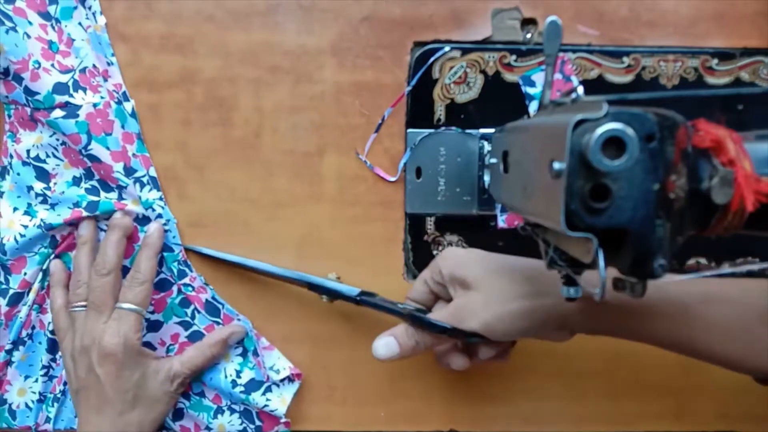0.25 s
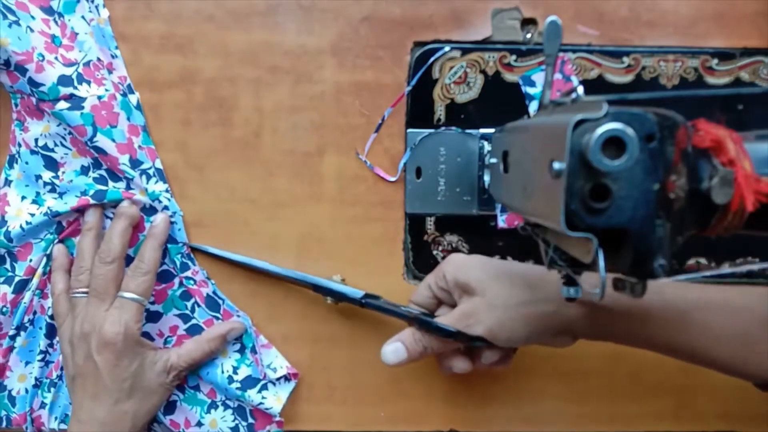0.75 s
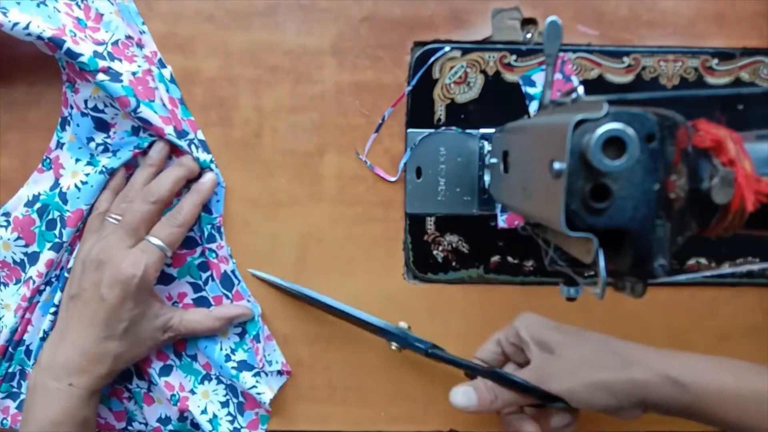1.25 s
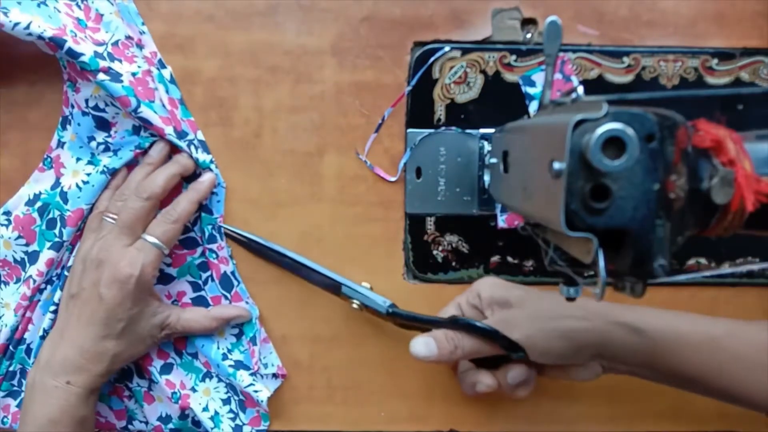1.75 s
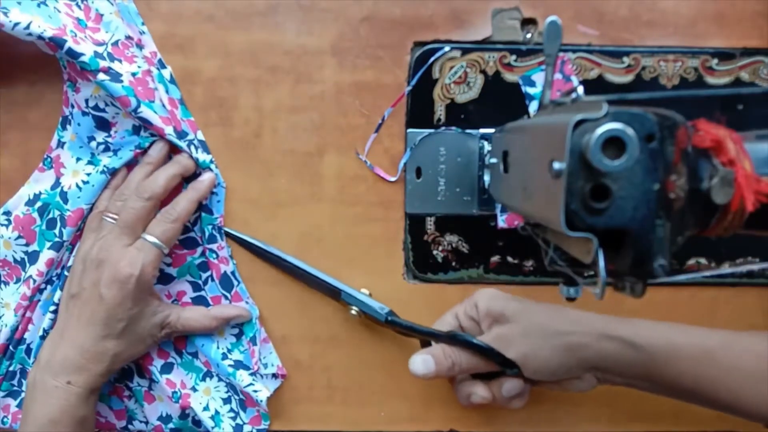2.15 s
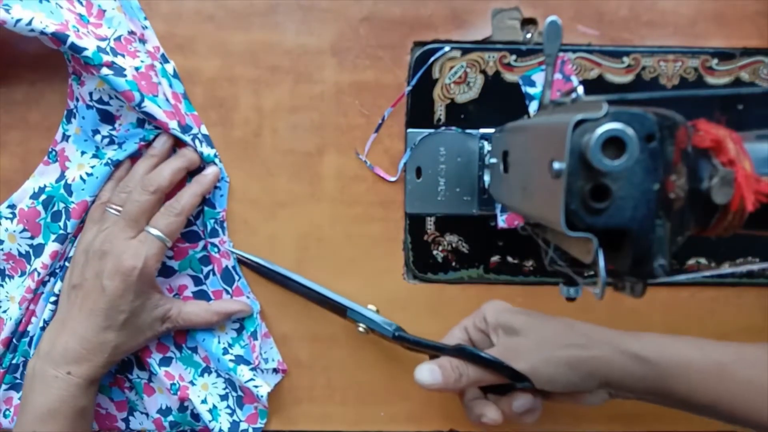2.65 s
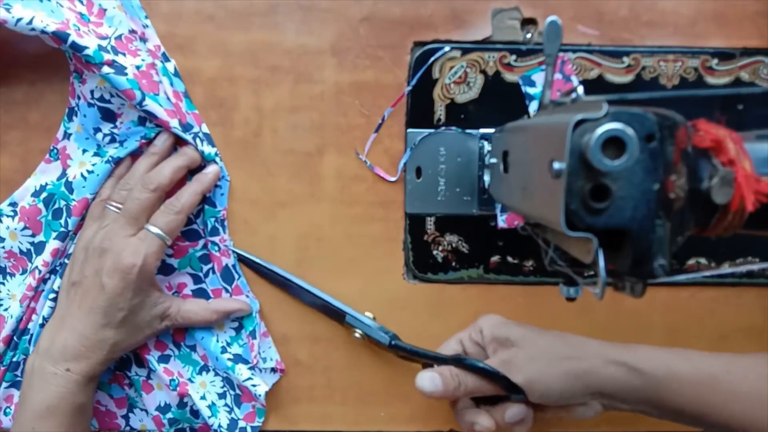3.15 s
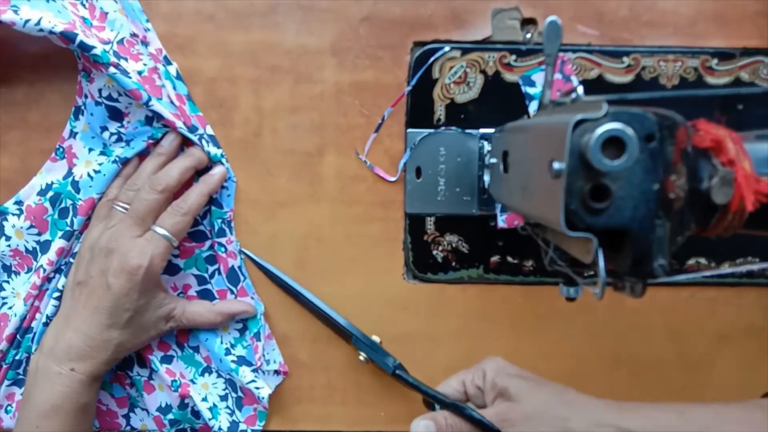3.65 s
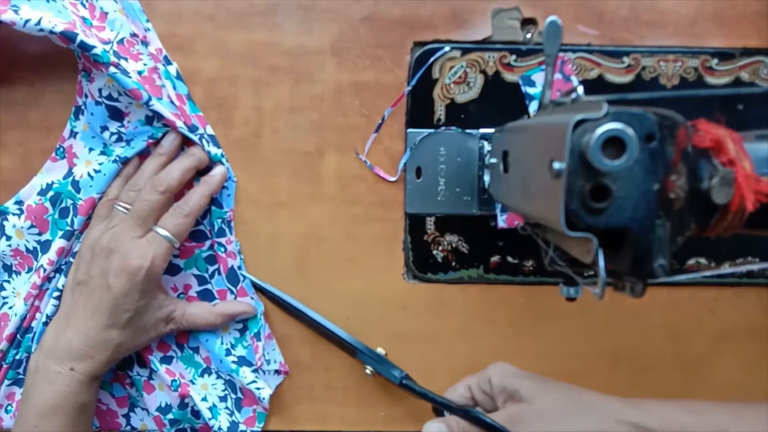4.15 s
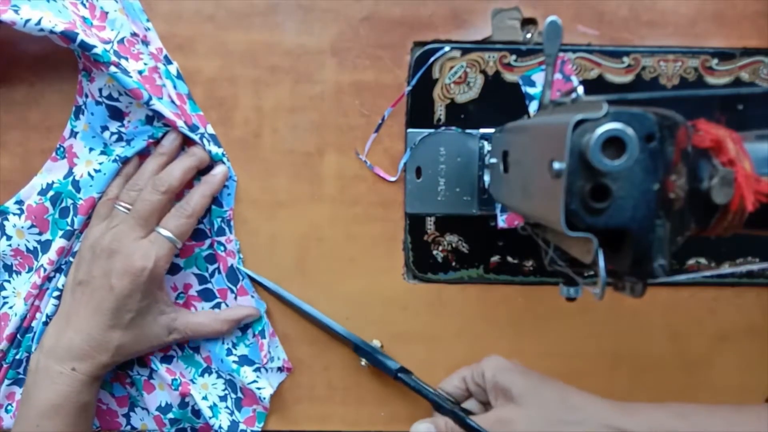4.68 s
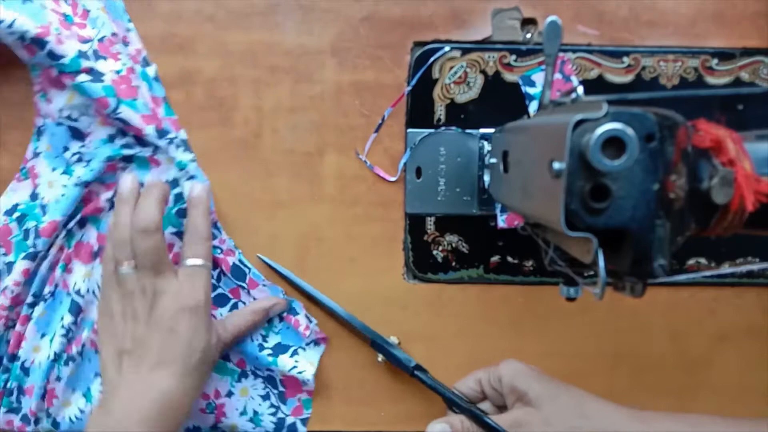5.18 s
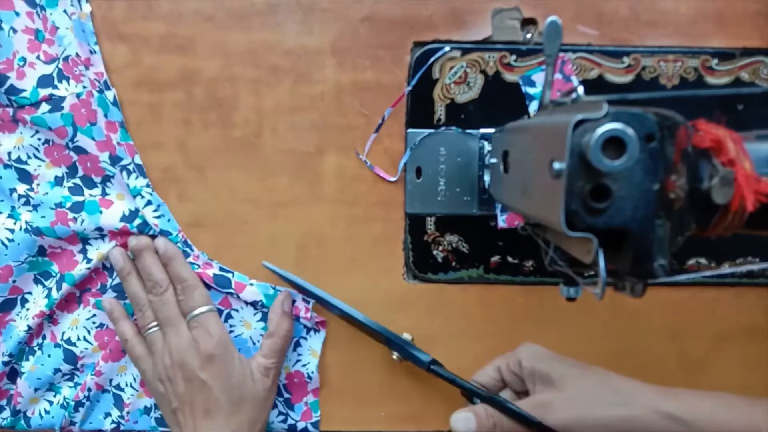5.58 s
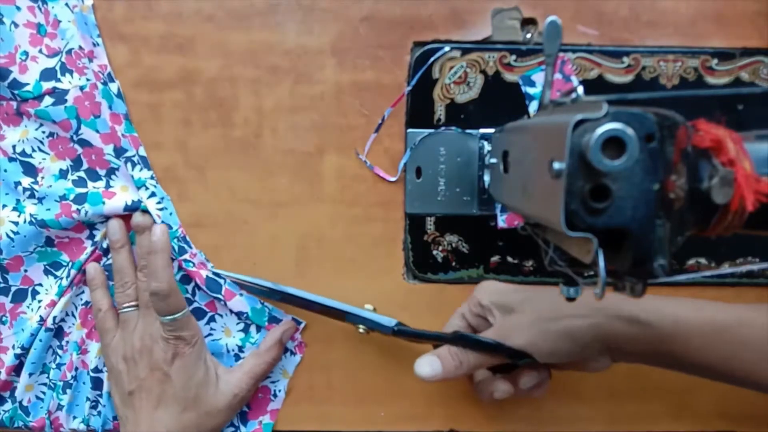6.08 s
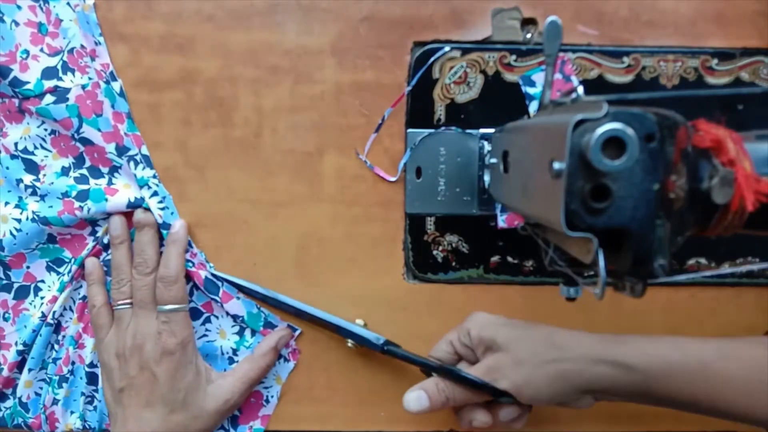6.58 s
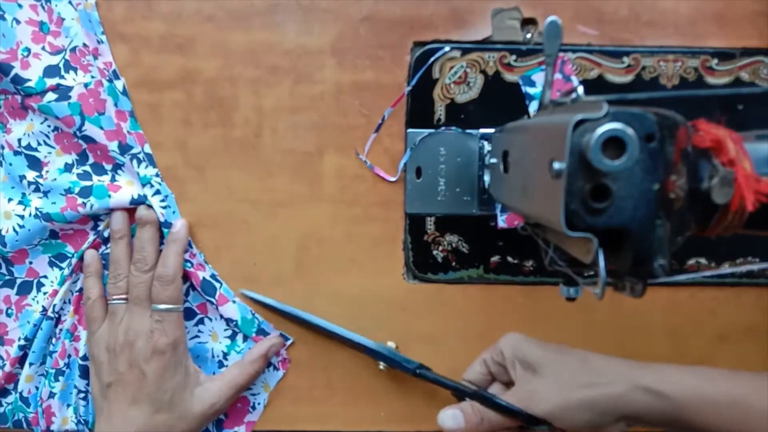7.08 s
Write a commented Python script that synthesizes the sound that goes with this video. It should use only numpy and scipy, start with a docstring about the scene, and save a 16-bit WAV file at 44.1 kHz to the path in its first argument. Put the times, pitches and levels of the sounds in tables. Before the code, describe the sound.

A close microphone catches metal shears scraping, snipping shut and rapping a resonant tabletop. Early knocks come in a pair, then two close together, then a strong one, followed by a quieter stretch of soft bumps and a far thin whine. Cloth rustles and drags with catching friction, one loud knock follows, and a dense burst of snip, knocks and rattling scrapes ends it. Faint room tone and insects continue throughout.

```python
"""Steel shears rasp and knock on a ringing hollow wooden table top; cloth is dragged, with hand bumps between.
Behind lie a low room rumble, insect hiss and chirps from outdoors, and a faint far whine that comes twice.
Clicks and dying noise flurries excite resonant table and blade modes; grains of friction make rasp and rustle.
Shaped noise gives rumble and insects, fluttering sines the whine; a banded noise tail gives the room."""
import sys
import numpy as np
from scipy import signal
from scipy.fft import rfft, irfft, next_fast_len
from scipy.io import wavfile

SR = 44100
rng = np.random.default_rng(int(sys.argv[2]) if len(sys.argv) > 2 else 0)


def inscribe(sig):
    """Save sig as 16-bit PCM at rate SR to the path in sys.argv[1].

    A 1-D sig is mono; a 2-D sig holds one channel per row.
    Samples are clipped to [-1, 1] before scaling.
    """
    pcm = np.round(np.clip(np.atleast_2d(sig).T, -1, 1) * 32767)
    wavfile.write(sys.argv[1], SR, pcm.astype(np.int16))


N = 323253

# Steel knocks on the table, relative levels: t/s, low ring/dB, hard ring/dB, crack/dB, blade tick/dB
KNOCK_EVENTS = [(0.789, -43, -42, -68, -45), (0.831, -31, -48, -40, -47), (0.852, -6.5, -17, -28, -41),
                (1.152, -11, -23.5, -40.5, -38.5), (2.13, -16.5, -57, -41, -30.5),
                (2.139, -8.5, -17.5, -26, -46), (2.327, -5.5, -14, -30.5, -29),
                (3.16, -17, -26.5, -40.5, -80), (3.294, -31.5, -36.5, -60, -53),
                (3.475, -68, -68, -74, -37), (3.552, -28.5, -40.5, -41, -26.5),
                (3.636, -2.5, -11, -22, -28.5), (3.824, -23.5, -31, -70, -61),
                (4.607, -22.5, -32, -52, -77.5), (5.734, -3, -21, -40, -40), (6.682, -37.5, -38, -68, -70),
                (6.769, -42, -28, -50, -74), (6.794, -17, -22, -62, -66), (6.812, -6, -14, -28.5, -66),
                (6.982, -5.5, -11.5, -20.5, -46)]


def from_db(db):
    """Decibels to amplitude gain."""
    return 10 ** (np.asarray(db) / 20)


def rms_one(x):
    """Scale to rms 1."""
    return x / np.sqrt(np.mean(x ** 2) + 1e-20)


def band_pass(x, order, low_hz, high_hz):
    """Butterworth band-pass."""
    sos = signal.butter(order, [low_hz, high_hz], "band", fs=SR, output="sos")
    return signal.sosfilt(sos, x)


def drift(rate_hz):
    """Slow random wander of rms 1: noise through two equal poles, run at SR / 40."""
    step = 40
    r = np.exp(-2 * np.pi * rate_hz * step / SR)
    noise = rng.standard_normal(N // step + 2002)
    slow = signal.lfilter([1], [1, -2 * r, r * r], noise)[2000:]  # settled part
    return np.interp(np.arange(N) / step, np.arange(len(slow)), rms_one(slow))


def ring(force, f_hz, t60_s):
    """Two-pole mode: a unit click rings to a height of about 1, with no static push left over."""
    r = from_db(-60 / (t60_s * SR))
    w = 2 * np.pi * f_hz / SR
    return signal.lfilter([.5, 0, -.5], [1, -2 * r * np.cos(w), r * r], force + 1e-18)


def clicks_at(rows, sizes):
    """One click per row, at the time in its first column."""
    out = np.zeros(N)
    out[[round(row[0] * SR) for row in rows]] = sizes
    return out


def grains(per_s, spread_db):
    """Friction grains: random clicks of uneven size and sign; rms 1."""
    sizes = from_db(spread_db * np.minimum(rng.exponential(1, N), 4))
    signs = rng.choice([-1, 1], N)
    return rms_one(sizes * signs * (rng.random(N) < per_s / SR))


def flurry(level_db, decay_s):
    """Each knock is a dying flurry of tiny slips and bounces: noise under an exponential decay."""
    decay = np.exp(-1 / (decay_s * SR))
    envelope = signal.lfilter([1], [1, -decay], clicks_at(KNOCK_EVENTS, from_db(level_db)))
    return envelope * rng.standard_normal(N)


def coloured_noise(spectrum, patchy_db, rate_hz):
    """Shaped noise; third-octaves, dealt into six sets, swell set by set; rms 1."""
    size = next_fast_len(N)
    f_hz, level_db = np.transpose(spectrum)
    f = np.maximum(np.arange(size // 2 + 1) * SR / size, 1)
    shape_db = np.interp(np.log(f), np.log(f_hz), level_db, left=-90, right=-90)
    whole = rfft(rng.standard_normal(size)) * from_db(shape_db)
    group = np.floor(3 * np.log2(f)).astype(int) % 6
    out = np.zeros(N)
    for k in range(6):
        out += irfft(whole * (group == k), size)[:N] * from_db(patchy_db * drift(rate_hz))
    return rms_one(out)


def rumble():
    """Room rumble: low-weighted noise with patchy swells."""
    # Relative spectral density: f/Hz, level/dB per Hz
    spectrum = [(15, -64), (25, -38), (92, -5.5), (294, -10), (343, -7.5), (382, -12.5), (528, -14),
                (814, -17), (1180, -16), (1280, -2), (1400, -24.5), (1590, -13.5), (1810, -27),
                (2560, -24.5), (4400, -31), (5720, -79), (9680, -120)]
    return from_db(-59) * coloured_noise(spectrum, patchy_db=4.5, rate_hz=5.6)


def insects():
    """Insect hiss: high-frequency noise with shallow swells."""
    # Relative spectral density: f/Hz, level/dB per Hz
    spectrum = [(2590, -71), (4400, -46), (4720, -18.5), (5090, -7.5), (5370, -6), (5950, -15),
                (6220, -17.5), (6960, 2), (7430, 3), (8230, -5.5), (9120, -9.5), (10900, -34.5),
                (11900, -31), (14800, -33), (16000, -40)]
    return from_db(-58.5) * coloured_noise(spectrum, patchy_db=1.4, rate_hz=9.1)


def chirps():
    """Brief rough insect notes: noise through a narrow resonance under a smooth swell."""
    # Chirps: start t/s, level at crest/dB
    events = [(5.1904, -53.5), (5.2939, -58), (5.4675, -59), (5.663, -59), (5.8536, -55.5), (5.9554, -57)]
    f_hz, duration_s, t60_s = 5193, 0.025, 0.058
    starts = clicks_at(events, from_db(np.transpose(events)[1]))
    swell = signal.fftconvolve(starts, np.hanning(int(duration_s * SR)))[:N]
    return swell * rms_one(ring(rng.standard_normal(N), f_hz, t60_s))


def whine():
    """Far buzz: three neighbouring partials (9th to 11th) with fluttering pitch and level."""
    # Notes: start t/s, hold/s from start, 10th partial f/Hz, its level/dB, 11th partial rel. level/dB
    notes = [(4.035, 0.66, 3300, -56.5, -7), (5.09, 0.55, 3230, -60.5, -0.5)]
    attack_s, fade_db_per_s, lower_db = 0.14, 39.5, -14
    t = np.arange(N) / SR
    out = np.zeros(N)
    for start, hold, f_hz, level_db, upper_db in notes:
        attack = np.clip((t - start) / attack_s, 0, 1)
        fade_db = fade_db_per_s * np.maximum(t - start - hold, 0)
        gain = attack * from_db(level_db - fade_db)
        for order, order_db in zip((9, 10, 11), (lower_db, 0, upper_db)):
            flutter_db = 5.0 * np.clip(drift(30), -3, 1.3)
            pitch_hz = order / 10 * f_hz + 14.0 * drift(30)
            phase = 2 * np.pi * np.cumsum(pitch_hz) / SR
            out += gain * from_db(order_db + flutter_db) * np.sin(phase)
    return out


def drag():
    """Dragged cloth: rustle gain, and low and hard table gains modulated as it catches and lets go."""
    # Drag envelope, relative levels, silent outside: t/s, rustle/dB, table low/dB
    envelope = [(4.93, -89, -70), (5.0, -78.5, -45), (5.08, -79, -62), (5.13, -79, -57), (5.24, -70, -44.5),
                (5.38, -85, -58.5), (5.43, -81, -86), (5.52, -86, -83), (5.61, -85.5, -89),
                (5.71, -77, -66.5)]
    hard_over_rustle_db, stick_slip_db, stick_slip_hz = 21, 7.5, 18.6
    s, *columns = np.transpose(envelope)
    t = np.arange(N) / SR
    cloth, low = [from_db(np.interp(t, s, c, left=-200, right=-200)) for c in columns]
    catch = from_db(stick_slip_db * drift(stick_slip_hz))
    return cloth, catch * low, from_db(hard_over_rustle_db) * catch * cloth


def rustle(gain):
    """Fibres sliding on varnish: fluttering fine grains, broad in colour."""
    fibres = grains(12000, spread_db=1.5) * from_db(2.5 * drift(25))
    return from_db(18.0) * gain * band_pass(fibres, 1, 800, 6000)


def bumps():
    """Hand and handle bumps: smooth pushes as thump and low-ring forces."""
    # Bumps, relative levels: start t/s, low ring/dB, thump/dB
    events = [(0.079, -20.5, -91), (0.179, -27.5, -78), (0.395, -47, -75), (2.492, -26, -63.5),
              (2.812, -33, -62), (3.38, -32, -66.5), (4.069, -29.5, -72), (4.113, -36.5, -74),
              (4.249, -38, -74), (4.371, -41, -63), (4.537, -36.5, -52), (4.638, -47, -51),
              (4.893, -37.5, -55), (5.02, -30, -77), (5.225, -29, -57), (6.231, -35, -87),
              (6.311, -36, -76), (6.583, -26, -63.5), (7.299, -33, -81)]
    contact_s = 0.0023
    _, low_db, thump_db = np.transpose(events)
    push = np.hanning(int(contact_s * SR))
    push /= push.sum()
    thump = np.convolve(clicks_at(events, from_db(thump_db + 9.5)), push)[:N]
    low = np.convolve(clicks_at(events, from_db(low_db - 10.0)), push)[:N]
    return thump, low


def slides():
    """Blades sliding open or over wood: gains of rasp, low and hard shaking that rise and fall in dB."""
    # Slides, relative levels: peak t/s, 20 dB rise/s, 20 dB fall/s, rasp/dB, table low/dB, table hard/dB
    events = [(0.004, 0.03, 0.13, -63, -34.5, -39.5), (0.87, 0.013, 0.19, -65, -38, -56),
              (1.074, 0.18, 0.14, -57, -71, -47), (1.168, .015, 0.059, -57, -30, -34),
              (1.322, 0.027, .06, -65, -50, -52), (2.088, 0.0091, 0.013, -56, -47, -64),
              (3.384, .02, 0.025, -57, -41, -36.5), (3.863, 0.2, 0.089, -58.5, -36, -34.5),
              (3.931, 0.01, 0.044, -59.5, -43.5, -38), (6.302, 0.013, 0.021, -87, -40.5, -38),
              (6.683, 0.0068, 0.083, -63, -51, -40), (6.832, 0.01, .09, -64, -27, -32.5),
              (6.915, 0.018, 0.076, -76, -39, -57), (7.03, 0.018, 0.052, -74, -32.5, -42),
              (7.085, 0.027, 0.051, -69, -32.5, -26), (7.15, 0.024, 0.059, -58, -64, -63)]
    t = np.arange(N) / SR
    out = np.zeros((3, N))
    for peak, rise, fall, *levels_db in events:
        below_peak_db = 20 * np.where(t < peak, (peak - t) / rise, (t - peak) / fall)
        out += from_db(-below_peak_db) * from_db(levels_db)[:, None]
    return out


def cuts():
    """Closing cuts through thread: gains of rasp, low and hard shaking swell until the blades meet."""
    # Cuts: start t/s, end t/s, relative rasp level at end/dB
    events = [(0.784, 0.838, -46.5), (2.086, 2.147, -49), (6.774, 6.812, -43)]
    swell_db_per_s, low_over_rasp_db, hard_over_rasp_db = 406, 20.5, 24.5
    t = np.arange(N) / SR
    out = np.zeros((3, N))
    for start, end, rasp_db in events:
        swell = from_db(rasp_db + swell_db_per_s * np.minimum(t - end, 0))
        swell *= (t > start) & (t < end)
        out += swell * from_db([[0], [low_over_rasp_db], [hard_over_rasp_db]])
    return out


def cracks():
    """First milliseconds of each knock: a band-passed noise burst."""
    crack_db = np.transpose(KNOCK_EVENTS)[3]
    return band_pass(flurry(crack_db + 2.8, 0.01), 2, 1300, 3600)


def blades(rasp):
    """Ticks and the grinding edge shake the steel: its modes ring over direct high-passed force."""
    # Steel modes: f/Hz, level/dB, t60/s
    modes = [(5210, -2.5, 0.014), (5720, -8.5, 0.013), (6770, 1, 0.0055), (9180, -8.5, 0.0073),
             (10030, 2.5, 0.0045), (11200, -28, 0.0087), (12500, -25, .005), (14520, -19, .006),
             (15900, 8, .006)]
    tick_db = np.transpose(KNOCK_EVENTS)[4]
    edge = grains(7000, spread_db=2.0)
    force = flurry(tick_db - 20.5, 0.0034) + from_db(-18.0) * rasp * edge
    direct = signal.sosfilt(signal.butter(2, 2500, "high", fs=SR, output="sos"), force)
    ringing = sum(from_db(level_db) * ring(force, f_hz, t60) for f_hz, level_db, t60 in modes)
    return from_db(12.0) * direct + ringing


def table(rub_low, rub_hard):
    """Knocks, bumps and rubbing excite the top's modes; steady noise keeps the same modes faintly shaking."""
    # Modes of the top: f/Hz, relative level/dB, t60/s
    modes = [(154.4, 2, 0.17), (270, -62.5, .1), (340.4, -22.5, 0.061), (356.3, -1.5, 0.23),
             (367.1, 1.5, 0.12), (422.9, -8, 0.17), (513.4, -19, 0.13), (587, -6, 0.066), (620, -21, 0.26),
             (840.6, -9.5, 0.085), (1000, -3, 0.013), (1144.6, -2.5, 0.038), (1285, 0, 0.055),
             (1426, 2.5, 0.02), (1561, -0.5, 0.024), (1675, 0.5, 0.027), (1735, 2.5, 0.0098),
             (1930, -14, 0.14), (2150, -16.5, 0.032), (2377, -8, 0.0091), (2890, -9, 0.012),
             (3268, -10.5, 0.0083), (3370, -20.5, 0.019)]
    # ranges: whole-top thump | low ring | hard ring | crack; the upper two need harder contacts
    range_limits_hz = [200, 760, 2050]
    s, low_db, hard_db, crack_db, _ = np.transpose(KNOCK_EVENTS)
    thump_db = -35 + 0.85 * low_db
    blow_db = [thump_db, low_db - 15.0, hard_db - 12.0, crack_db - 18.5]
    # knocks lean towards every other mode, by a random amount for each knock
    lean_db = 3.5 + 3.0 * rng.standard_normal(len(s))
    scatter_db = rng.normal(0, 1.5, (len(s), len(modes)))
    soft = [*bumps(), 0, 0]
    rough, air = grains(900, spread_db=4.0), rng.standard_normal(N)
    shaking = [from_db(-40.5) * rub_low * rough,
               from_db(-32) * rub_low * rough,
               from_db(-33.5) * rub_hard * rough + flurry(hard_db - 38.0, 0.01),
               from_db(-30.0) * rub_hard * rough + flurry(crack_db - 14.0, 0.006)]
    air_db = [-9, 16.0, 8.5, -77]
    parts, shaken = np.zeros((4, N)), np.zeros(N)
    for k, (f_hz, level_db, t60) in enumerate(modes):
        part = np.searchsorted(range_limits_hz, f_hz)
        alternate = (-1) ** k
        mode_lean_db = lean_db * alternate * (part > 0)
        knocks = clicks_at(KNOCK_EVENTS, from_db(blow_db[part] + mode_lean_db + scatter_db[:, k]))
        force = soft[part] + knocks + shaking[part]
        sign = alternate if part > 1 else 1  # upper modes alternate in sign, so their sum stays lean in the lows
        parts[part] += sign * from_db(level_db) * ring(force, f_hz, t60)
        shaken += from_db(level_db + air_db[part]) * ring(air, f_hz, t60)
    # each range is band-passed to keep its ring clear of the other ranges
    edges_hz = [(90, 235), (260, 666), (700, 2170), (1800, 15000)]
    wood = sum(band_pass(x, 3, *edge) for edge, x in zip(edges_hz, parts))
    jolt = clicks_at(KNOCK_EVENTS, from_db(low_db - 1))
    wood += band_pass(jolt + 1e-18, 2, 20, 60)  # deep jolt under each knock
    return wood, from_db(-75) * rms_one(shaken)


def room(x):
    """Reverberation: convolution with a noise tail that dies at its own rate in each band."""
    # Tail bands: low edge f/Hz, high edge f/Hz, level/dB, t60/s
    bands = [(185, 580, -8, 0.55), (720, 2470, -2.5, 0.42), (2600, 5140, -2.5, 0.4),
             (6060, 9600, -5.5, 0.26), (9850, 16000, -11.5, 0.42)]
    t = np.arange(int(.7 * SR)) / SR
    rise = 1 - np.exp(-(t / 0.0056) ** 2)  # first walls answer late
    tail = np.zeros(len(t))
    for low_hz, high_hz, level_db, t60 in bands:
        noise = band_pass(rng.standard_normal(len(t)), 2, low_hz, high_hz)
        decay = from_db(level_db - 60 * t / t60)
        tail += decay * noise * rise / np.sqrt(t60 * SR / (2 * np.log(1000)))  # even out decay energy
    return signal.fftconvolve(x, tail)[:N]


def scene():
    """Table, cloth and shears with their room echo, over the background."""
    rasp, shear_low, shear_hard = cuts() + slides()
    cloth, drag_low, drag_hard = drag()
    wood, shaken = table(shear_low + drag_low, shear_hard + drag_hard)
    near = wood + cracks() + blades(rasp) + rustle(cloth)
    background = shaken + rumble() + insects() + whine() + chirps()
    return (near + room(near) + background)[None]


def record(dry):
    """Steep low-pass: 60 dB down from 16200 Hz."""
    return signal.sosfilt(signal.cheby2(12, 60, 16200, fs=SR, output="sos"), dry)


dry = scene()
out = record(dry)
inscribe(out)
```